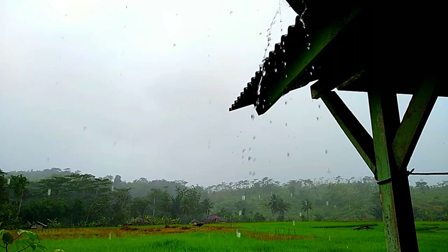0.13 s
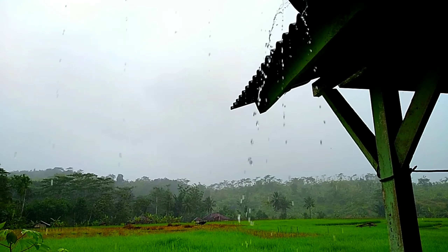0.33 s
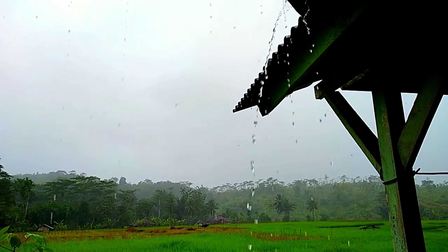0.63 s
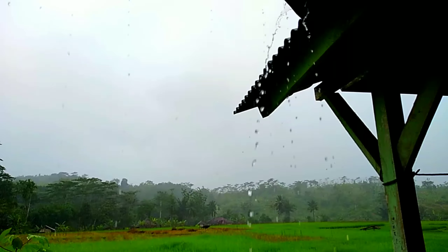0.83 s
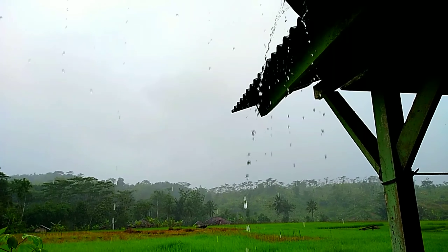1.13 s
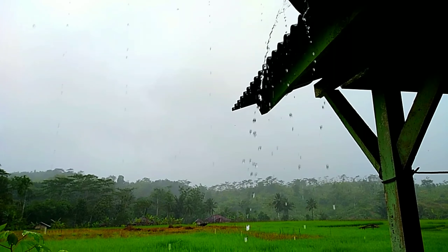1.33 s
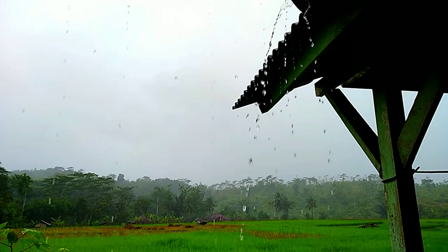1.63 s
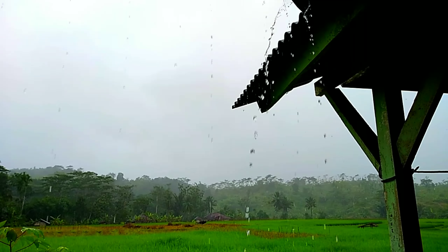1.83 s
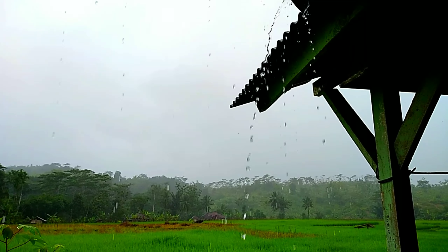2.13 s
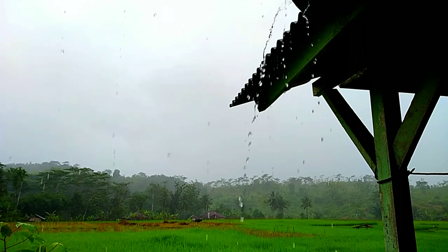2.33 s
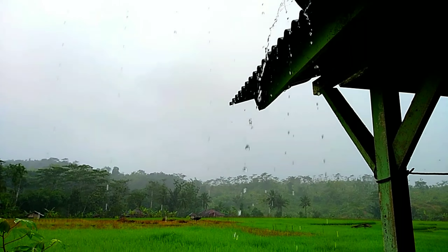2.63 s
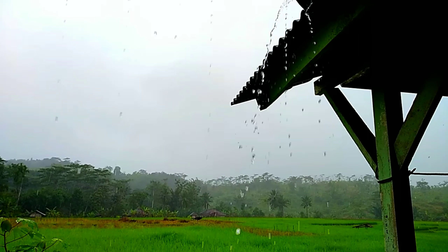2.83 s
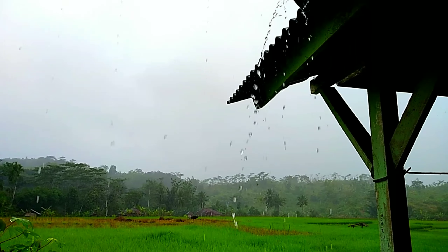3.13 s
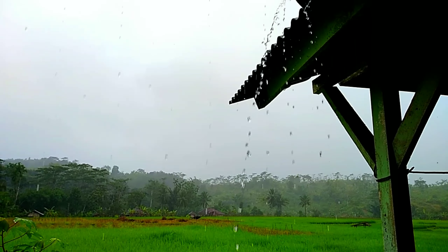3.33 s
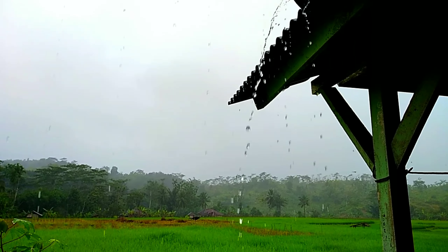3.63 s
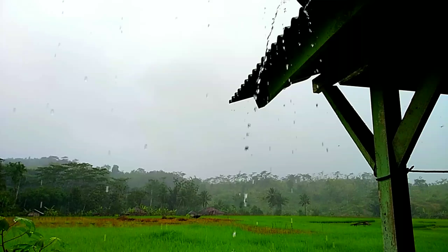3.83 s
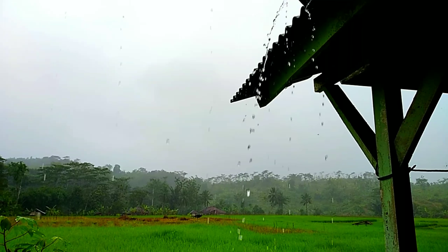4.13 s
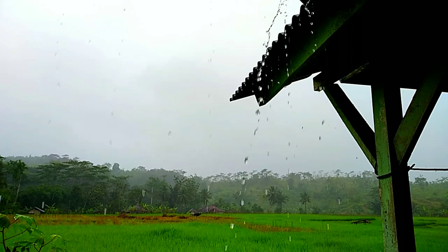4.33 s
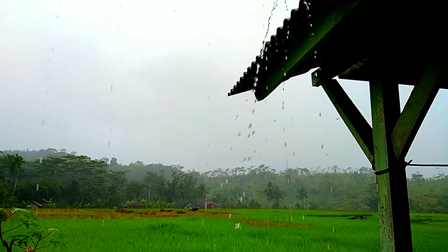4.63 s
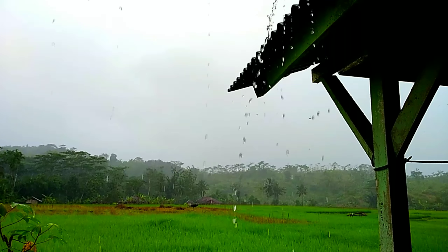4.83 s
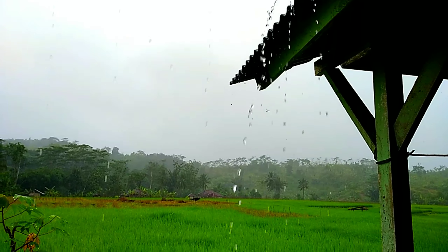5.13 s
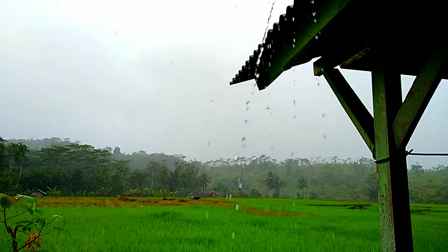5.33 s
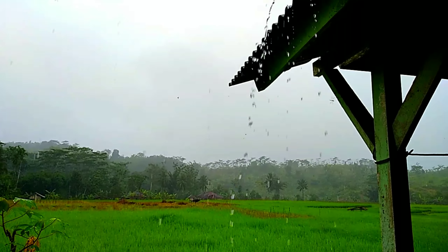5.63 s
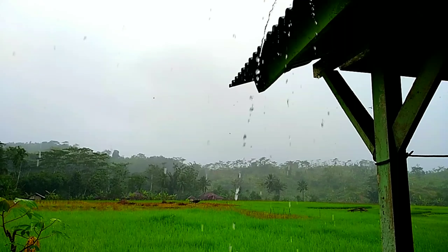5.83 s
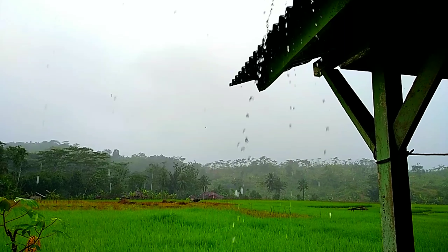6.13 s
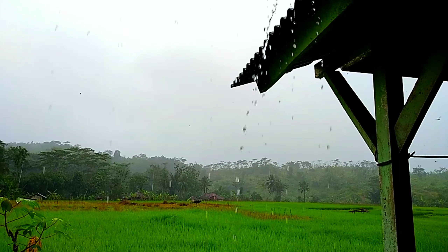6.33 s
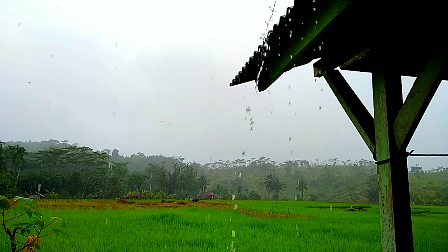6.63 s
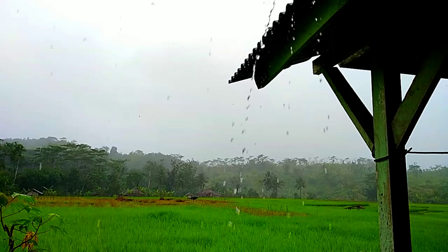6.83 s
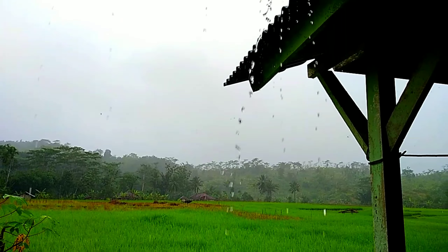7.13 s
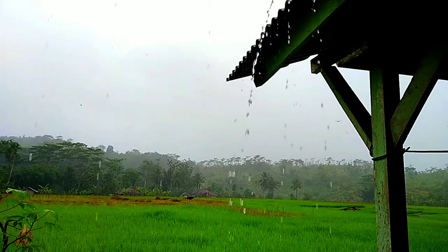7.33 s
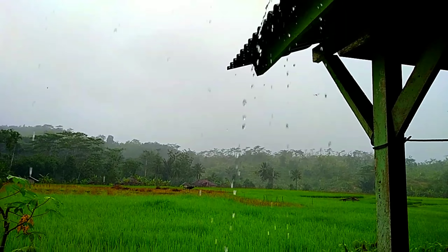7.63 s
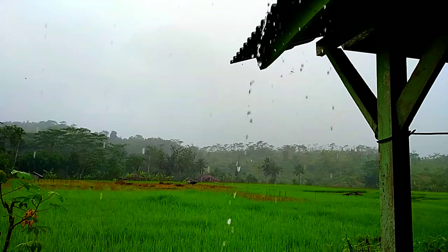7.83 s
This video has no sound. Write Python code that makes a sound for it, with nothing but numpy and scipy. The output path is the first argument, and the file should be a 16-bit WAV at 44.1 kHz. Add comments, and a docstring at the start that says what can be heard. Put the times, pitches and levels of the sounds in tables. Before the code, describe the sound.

Steady rain over green fields is heard from under a corrugated sheet roof, in close, dry outdoor stereo. A broad, bright hiss with gentle patchiness and dense tiny patter runs unchanged for all 8 seconds. Irregular heavy drops and run-off fall on top, several each second: sharp splashy ticks, short noisy splats, and low knocks that ring briefly in the sheet. Quick drips cluster from 0.3 to 0.8 s; strong splashes land at 2.1 and 2.4 s. Hollow little notes follow some drops, around 2.8 and 3.5 s, with a clear resonant plink at 4.5 s and a firm tap at 4.8 s. A bright splat comes at 4.9 s, a dripping flurry at 5.8 s, hollow plops at 6.3 and 7.6 s, and a short hard tap at the very end. Low breeze puffs nudge the left side, most near 2.1, 5.2, 7.1 and 7.5 s.

```python
"""Steady rain over open fields, heard from under a corrugated sheet roof: patchy noise for the far hiss.
Heavy drops and run-off strike the sheet and the wet ground as banded noise bursts through sheet resonances.
Close and faint ticks are short tones with a splash; some drops leave gliding hollow notes.
A light breeze now and then puffs low noise on the left microphone port."""
import sys
import numpy as np
from scipy import signal
from scipy.fft import rfft, irfft, next_fast_len
from scipy.io import wavfile
from scipy.ndimage import uniform_filter1d

SR = 44100
rng = np.random.default_rng(int(sys.argv[2]) if len(sys.argv) > 2 else 0)


def to_wav(s):
    """Save 16-bit WAV."""
    ch = np.atleast_2d(s).T  # columns
    pcm = np.round(np.clip(ch, -1, 1) * 32767)  # PCM
    wavfile.write(sys.argv[1], SR, pcm.astype(np.int16))


N = 351477  # samples


def hiss(patchy_db):
    """Far rain merges into noise with soft patches; its low body stays steadier."""
    hz, _, spectrum = signal.stft(rng.standard_normal((2, N)), SR, nperseg=512)
    patches = uniform_filter1d(rng.standard_normal(spectrum.shape[1:]), size=10, axis=0)
    patches = unit(uniform_filter1d(patches, size=8, axis=1))
    depth_db = patchy_db * along([300, 2500], [.35, 1], hz)[:, None]
    _, noise = signal.istft(spectrum * amp(depth_db * patches), nperseg=512)
    return unit(noise[:, :N])


# Bursts of heavy drops on sheet and ground; rows at the same moment sound together as one drop.
# Each row: start in seconds, level in dB over the hiss (nominal, before the sheet), centre in Hz,
# bandwidth in octaves (nominal), t60 in seconds.
HEAVY_BURSTS = [(.068, 16, 13450, 0.4, .043), (.122, 14, 3200, 0.25, 0.077), (.158, -0.5, 9510, 0.93, 0.51),
                (.251, 6, 15000, 0.97, 0.27), (.303, 11, 8550, 0.22, 0.34), (.327, 13.5, 2920, 0.38, 0.2),
                (.358, 15, 2650, 0.33, 0.15), (.371, 14.5, 1420, 0.18, 0.17),
                (.461, 21.5, 14200, 0.18, 0.32), (.461, 12, 9000, 0.39, 0.22),
                (.519, 12.5, 1670, 0.18, 0.29), (.557, 19.5, 500, 0.41, 0.14),
                (.581, 8.5, 7000, 0.35, 0.54), (.629, 9, 6160, 0.65, 0.35), (.68, 17.5, 2000, 0.16, 0.28),
                (.71, 10.5, 2520, 0.31, 0.25), (.704, 15, 307, 0.24, 0.32), (.756, 8, 1200, 0.44, 0.52),
                (.764, 9, 13450, 0.96, 0.68), (.796, 16, 3060, 0.54, 0.19), (.966, 10.5, 6900, 0.12, 0.45),
                (1.038, 18.5, 1080, 0.23, 0.11), (1.09, 7.5, 6300, 0.7, 0.4),
                (1.143, 8.5, 6730, 0.33, 0.93), (1.243, 10.5, 4430, 0.93, 0.47),
                (1.307, 8.5, 3180, 0.29, 0.45), (1.359, 19, 2000, 0.23, 0.11),
                (1.397, 13, 6450, 0.44, 0.33), (1.403, 16.5, 4000, 0.45, 0.24),
                (1.537, 6, 8000, 0.57, 0.65), (1.602, 16, 7200, 0.32, 0.2), (1.694, 13.5, 1310, 0.38, 0.31),
                (1.737, 11.5, 7900, 0.38, 0.85), (1.814, 19, 2690, 0.099, 0.19),
                (1.838, 8, 15000, 0.38, 0.49), (1.95, 12.5, 5500, 0.12, 0.35),
                (1.987, 8.5, 360, 0.73, 0.83), (2.007, 5.5, 9000, 0.69, .15),
                (2.007, 22.5, 2660, 0.18, 0.14), (2.047, 13.5, 2740, 0.28, 0.54),
                (2.01, 12.5, 846, 0.29, 0.46), (2.048, 15.5, 890, 0.28, 0.36), (2.053, 22, 290, 0.15, 0.2),
                (2.081, 21.5, 7900, 0.26, 0.17), (2.081, 28, 2260, 0.29, 0.072),
                (2.173, 10.5, 5200, 0.68, 1), (2.285, 12, 6600, 0.61, 0.15), (2.4378, 25, 5260, 0.69, 0.2),
                (2.449, 20, 8600, 0.14, 0.26), (2.466, 20.5, 6730, 0.31, 0.25),
                (2.44, 11, 3000, 0.37, 0.27), (2.48, 4.5, 1970, 1, 0.97), (2.52, 12, 426, 0.41, 0.22),
                (2.702, 9, 1910, 0.32, 0.29), (2.732, 16.5, 756, 0.67, 0.18), (2.796, 16, 483, 0.93, 0.4),
                (2.8, 13, 6860, 0.37, 0.24), (2.844, 18, 4400, 0.31, 0.23),
                (2.856, 19.5, 1150, 0.36, 0.085), (2.94, 15, 2800, 0.32, 0.23),
                (2.971, 14.5, 630, 0.63, 0.2), (3.001, 17, 285, 0.27, 0.16), (3.051, 9, 5140, 1, 0.43),
                (3.097, 8.5, 1410, 1, 0.13), (3.15, 12, 150, 0.27, 0.99), (3.197, 12.5, 7800, 0.8, 0.18),
                (3.375, 11, 3380, 0.24, 0.97), (3.4, 12.5, 1780, 0.25, 0.56), (3.408, 10, 5570, 0.28, .5),
                (3.45, 5, 6600, 0.24, 0.27), (3.466, 9, 5600, 0.22, 0.32), (3.5, 20.5, 268, 0.28, 0.4),
                (3.514, 19.5, 915, 0.38, 0.35), (3.588, 6, 6730, 0.45, 0.38),
                (3.638, 8.5, 1180, 0.67, 0.96), (3.656, 19.5, 2340, 0.26, 0.16),
                (3.682, 23, 14500, 0.27, 0.14), (3.688, 10, 14000, 0.34, 0.12),
                (3.724, 10, 2030, 0.18, 0.97), (3.817, 4.5, 7950, 0.9, 0.51), (4.013, 1, 5000, 0.48, 0.35),
                (4.013, 19.5, 587, 0.35, 0.059), (4.097, 10, 6100, 0.38, 0.38),
                (4.238, 11.5, 6550, 0.35, 0.24), (4.264, 18.5, 590, 0.31, 0.24), (4.38, 13, 920, .4, 0.18),
                (4.44, 18.5, 1240, 0.59, 0.13), (4.476, 22.5, 2220, 0.38, 0.11),
                (4.505, 11, 2940, 0.75, 0.21), (4.578, 10, 6370, 0.28, 0.42), (4.697, 2.5, 2500, 1, 0.96),
                (4.723, 16.5, 6250, 0.29, 0.79), (4.795, 18.5, 5900, 0.15, 0.13),
                (4.835, 28.5, 1500, 0.13, 0.12), (4.915, 7.5, 744, 1, 0.86),
                (4.916, 17.5, 7250, 0.98, 0.28), (4.965, 14, 2370, 0.31, 0.11),
                (4.985, 13, 5900, 0.38, 0.23), (5.076, 9, 3530, 0.55, 0.59), (5.094, 6.5, 820, 0.92, 0.36),
                (5.171, 5, 8000, 0.99, 0.13), (5.19, 8, 2760, 0.17, 0.59), (5.354, 10.5, 5570, .26, 0.4),
                (5.388, 21, 1880, 0.28, 0.039), (5.396, 12, 6640, 0.18, .35), (5.49, 4, 15000, 1, 1),
                (5.553, 9.5, 350, .25, .93), (5.605, 11, 990, 0.31, 0.44), (5.635, 16, 430, 1, 0.23),
                (5.747, 13.5, 6170, 0.2, 0.6), (5.747, 12, 2860, 0.17, 0.42),
                (5.777, 24.5, 2740, 0.14, 0.21), (5.777, 15.5, 2660, 1, 0.16),
                (5.903, 8.5, 2070, 0.58, 0.48), (5.942, 10, 6570, 0.19, 0.56), (6.034, 12, 6440, 0.2, 0.14),
                (6.146, 2, 9000, 0.72, .3), (6.202, 4, 11100, .95, 1), (6.228, 13.5, 1050, 0.5, 0.24),
                (6.234, 11.5, 5230, 0.21, 0.52), (6.252, 14, 1040, 0.92, 0.78),
                (6.29, 25, 1400, 0.32, 0.12), (6.328, 13.5, 6800, 0.14, 0.3), (6.364, 20.5, 855, 1, 0.068),
                (6.499, 25, 9300, 0.43, 0.018), (6.557, 12, 5900, 0.23, 0.24),
                (6.591, 11, 2480, 0.25, 0.22), (6.591, 7, 4500, 0.91, 0.62), (6.623, 17, 6660, 0.16, 0.18),
                (6.629, 11, 1950, 0.93, 0.14), (6.662, 19, 650, 0.5, 0.16), (6.695, 11, 5660, 0.41, 0.42),
                (6.733, 14, 7650, 0.31, 0.55), (6.737, 11, 1440, 0.67, 0.5), (6.759, 23, 1260, 0.16, 0.08),
                (6.813, 10, 505, 0.88, 0.38), (6.842, 15, 1010, 0.21, 0.35), (6.958, 8, 350, 1, 0.42),
                (7.004, 9, 1980, 0.67, 0.18), (7.027, 10, 1870, 0.53, 0.27), (7.026, 5, 13450, 1, 0.59),
                (7.118, 9, 4970, 0.26, 0.57), (7.339, 6.5, 5030, 0.63, 0.77),
                (7.427, 6.5, 1940, 0.31, 0.52), (7.447, 11, 6860, 0.2, 0.3), (7.477, 14, 3420, .2, 0.15),
                (7.497, 23.5, 3150, 0.18, 0.15), (7.497, 12, 11200, 0.47, 0.15),
                (7.509, 7.5, 1420, 0.79, 1), (7.558, 16, 860, 0.47, 0.59), (7.745, 14, 570, 0.32, 0.14),
                (7.774, 11, 6800, 0.18, 0.24), (7.794, 19, 1110, 0.43, 0.094), (7.814, 6, 2050, 0.25, 0.98),
                (7.583, 10, 2110, .2, .25), (7.618, 11, 2060, .2, .2), (7.92, 14, 1770, 0.37, 0.25),
                (7.962, 30, 2010, 0.085, 0.055)]
BURST_SIDE_DB, BURST_SCATTER_DB = -0.5, 2.5  # left-right: mean, full range of scatter


def heavy_drops():
    """The bursts of the heavy drops, each given a random side."""
    side_db = BURST_SIDE_DB + BURST_SCATTER_DB * (rng.random(len(HEAVY_BURSTS)) - .5)
    return np.column_stack([HEAVY_BURSTS, side_db])


def small_drops(count, floor_db):
    """Lighter bursts at random moments, levels, pitches and sides, in the columns of heavy_drops()."""
    u = rng.random((count, 6))
    start_s = u[:, 0] * N / SR
    level_db = floor_db + 6 * u[:, 1] ** 2
    centre_hz = 300 * 2 ** (5.94 * u[:, 2] ** 0.92)
    octaves = 0.19 + 0.71 * u[:, 3]
    t60_s = 0.08 + 0.19 * u[:, 4]
    side_db = 8 * (u[:, 5] - .5)
    return np.array([start_s, level_db, centre_hz, octaves, t60_s, side_db]).T


def strikes(rows, crack, spatter_db):
    """Each row is one banded burst: a crack, then a decay broken up by spatter; the sheet rings on."""
    start_s, level_db, centre_hz, octaves, t60_s, side_db = np.transpose(rows)[..., None]
    t = np.arange(SR // 4) / SR

    def band(hz):
        offset = np.log2((hz + 1) / centre_hz) / np.maximum(octaves, .08)
        return np.exp(-.22 * np.abs(offset) ** 3.04)

    burst = filtered(rng.standard_normal((2, len(rows), len(t))), band)
    rise = 1 - np.exp(-t / (0.00096 + 2.0 / centre_hz))  # low drumming takes a few cycles to build
    decay = amp(-60 * t / np.maximum(t60_s, .02)) * np.cos(2 * np.pi * t)  # cosine reaches 0 at 0.25 s
    shape = rise * (decay + crack * amp(-60 * t / 0.0048))
    bumps = np.clip(wobble(750, burst.shape[1:]), -.6, 1.7)
    spatter = amp(spatter_db * bumps * (np.minimum(centre_hz, 5500) / 4000) ** 0.12)
    burst = burst * shape * spatter
    # a burst's energy is set by its row, however the spatter falls
    band_power = np.mean(band(np.linspace(0, SR / 2, num=2000)) ** 2, axis=1)
    due = band_power * np.sum(shape ** 2, axis=1)
    energy = np.mean(np.sum(burst ** 2, axis=2), axis=0)
    burst = burst * np.sqrt(due / energy)[:, None]
    burst = burst * amp(level_db) * amp([side_db / 2, -side_db / 2])
    return filtered(placed(start_s[:, 0], burst), sheet)


# Resonances of the roof sheet. Each row: centre in Hz, width in Hz, peak gain in dB (of that mode alone).
SHEET_MODES = [(251.6, 4, 6), (423, 72, 4), (766, 10, 3), (907, 22, 6), (1112, 13, 9.5), (1563, 49, 7.5),
               (1785, 23, 11), (2043, 38, 8.5), (2420, 74, 5.5), (2730, 37, 8), (3093, 7.9, 12.5),
               (5320, 120, 7), (6640, 600, 4)]


def sheet(hz):
    """Roof sheet response: the direct sound plus a band-pass resonance for each mode."""
    response = 1
    for centre_hz, width_hz, gain_db in SHEET_MODES:
        damping = 1j * hz * width_hz
        response = response + (amp(gain_db) - 1) * damping / (centre_hz ** 2 - hz ** 2 + damping)
    return response


# Sharp close ticks; rows nearly together give one tick several pitches. Each row: start in seconds,
# peak in dB (nominal), pitch in Hz, left-right level in dB.
CLOSE_TICKS = [(.1212, -37, 9930, 3), (.1575, -24, 6720, 1), (.1577, -22, 12800, 5), (.1577, -33, 3300, 10),
               (.232, -32, 6040, 0), (.3042, -29, 6700, 2), (.3125, -29, 8200, 2), (.3032, -28, 8640, 3),
               (.328, -34, 2480, 8), (.3336, -28, 3280, 17), (.36, -40, 2420, 10), (.367, -31, 2690, 10),
               (.372, -33, 2700, 10), (.3745, -31, 3000, 10), (.4003, -29, 2310, 1), (.4003, -28, 7420, 8),
               (.4408, -30, 6500, 0), (.4615, -22, 8650, 4), (.5412, -28, 9350, 2.5), (.541, -32, 14000, 7),
               (.54, -32, 1600, 0), (.571, -34, 3300, 8), (.651, -26, 7500, 0), (.68, -27, 14000, 7),
               (.707, -28, 14500, 7), (.7135, -26, 12500, 7), (.6838, -33, 2020, 4),
               (.6015, -29.5, 3280, 7), (.603, -26, 6500, 0), (.6295, -16, 6760, -5),
               (.6295, -21, 10300, 4), (.7653, -29, 9420, 2), (.8028, -28, 2900, 7), (.814, -26, 3330, 9),
               (.9662, -32, 6560, -16), (1.1443, -27, 6060, 12), (1.1653, -27, 7300, 14),
               (1.2116, -27, 7140, .5), (1.256, -34, 5900, 2), (1.264, -31, 3080, 10),
               (1.3084, -31, 2900, 15), (1.3593, -28, 2000, -3), (1.3967, -29, 5570, 2),
               (1.4036, -26, 3560, 19), (1.413, -25, 3640, 19), (1.428, -26, 3270, 12),
               (1.5376, -24, 9130, -6), (1.5614, -27, 6600, -2.5), (1.603, -15.5, 6600, -3),
               (1.737, -22, 6500, 6), (1.696, -32, 1300, 0), (1.754, -27, 9300, 1), (1.774, -20.5, 8400, 9),
               (1.789, -28, 5700, -2), (1.789, -28, 8600, 0), (1.804, -29, 8600, 0), (1.8188, -31, 2630, 9),
               (1.925, -30, 9500, 2), (1.95, -29, 5600, -4), (1.9607, -24, 5600, -6),
               (2.0074, -22, 2500, 2), (2.0078, -25, 7500, 1), (2.018, -23, 2800, 7), (2.022, -22, 2800, 9),
               (2.0487, -24, 2800, 16), (2.0555, -24, 2900, 14), (2.0645, -27, 3130, 15),
               (2.082, -13, 6840, -1), (2.0822, -16, 12900, 13), (2.082, -16, 2360, 10),
               (2.171, -20, 8850, 2), (2.1834, -33, 3750, 9), (2.2847, -26, 7000, 4),
               (2.4376, -10, 5450, -6), (2.438, -13, 6860, -7), (2.4384, -18, 10600, -3),
               (2.438, -21, 3400, 15), (2.7993, -32, 5430, -7), (2.7993, -38, 7500, 1),
               (2.8055, -29, 6360, 0), (2.8135, -33, 6400, 0), (2.833, -29, 8500, 0),
               (2.8433, -26, 4170, 3), (2.8433, -35, 2900, 6), (2.9365, -32, 6600, 0),
               (2.9365, -29, 2290, 6), (2.9495, -24.5, 3080, 12), (2.9537, -26.5, 3000, 17),
               (2.962, -27, 3060, 14), (3.0833, -23, 6800, -3), (3.1971, -21, 7060, 0),
               (3.4015, -34, 3200, 9), (3.409, -35, 3200, 9), (3.4175, -30, 3500, 9),
               (3.4256, -24, 5300, 0), (3.426, -33, 1880, 3), (3.4305, -27, 5700, 0),
               (3.447, -32, 3230, 12), (3.4663, -25, 5200, -1), (3.517, -27, 950, 8),
               (3.5235, -29, 6900, 1), (3.5885, -32, 7500, 0), (3.6565, -21.5, 2140, 3),
               (3.6645, -29, 2300, 5), (3.672, -32, 2280, 5), (3.706, -22, 14600, 7),
               (3.6812, -19, 14600, 11), (3.6812, -22, 9900, -1), (3.899, -25.5, 6440, 3),
               (4.0971, -26, 6840, -3), (4.107, -24, 7400, -6), (4.211, -27, 10400, 1.5),
               (4.2383, -29, 6400, 1), (4.4408, -26, 1570, -10), (4.469, -33, 2130, 7),
               (4.4753, -12, 1890, 4), (4.5252, -27, 2200, 7), (4.5295, -32, 2100, 4),
               (4.5171, -25.5, 10800, 1.5), (4.5765, -32, 5330, -1), (4.6925, -25.5, 9400, -3),
               (4.7278, -23, 6750, -12), (4.7508, -16, 6700, -6), (4.768, -19, 7050, -5),
               (4.797, -22, 6840, -8), (4.9165, -11.5, 8900, 0), (4.9162, -22, 3010, 9),
               (4.9641, -28, 2260, 4), (5.171, -39, 7000, 0), (5.3967, -24.5, 5970, -14),
               (5.491, -25, 9140, -5), (5.5975, -26, 7000, -6), (5.747, -24, 5900, -12),
               (5.7647, -24, 6070, -5), (5.7645, -28, 2760, 5), (5.7773, -15, 2450, 0),
               (5.7798, -17, 2400, 1), (5.7775, -26, 6300, -2), (5.7852, -24, 2500, 4),
               (5.7905, -23, 2800, 5), (5.8005, -22, 2620, 5), (5.8122, -24, 2920, 8),
               (5.8095, -24, 6760, -3), (5.9434, -29, 2310, 1), (5.944, -31, 6400, -1.5),
               (6.035, -33, 6560, 10), (6.055, -29, 6500, -2), (6.1462, -32, 10800, 0),
               (6.176, -31, 7000, -3), (6.2026, -24, 9300, -1), (6.2682, -28, 5400, -7),
               (6.272, -26, 5300, -3), (6.31, -27, 11500, 2), (6.328, -33, 7100, 0), (6.364, -37, 1100, 0),
               (6.4368, -26, 2100, -2), (6.4992, -30, 10100, 6), (6.629, -33, 1350, 0),
               (6.629, -31, 2300, 5), (6.655, -33, 2200, 5), (6.6872, -32, 6490, -5),
               (6.5565, -27, 5840, -10), (6.7063, -26.5, 5900, -13), (6.7385, -19, 8940, -3),
               (6.739, -25, 1160, -1), (6.7385, -29, 1730, 2), (6.748, -24, 1090, 0),
               (6.7585, -29, 1290, 0), (6.802, -33, 1400, 0), (7.004, -27.5, 1940, 6),
               (7.017, -31, 2200, 4), (7.0259, -33, 10700, -1), (7.027, -37, 2900, 5),
               (7.032, -29, 2100, 4), (7.053, -32, 1550, -2), (7.057, -36, 3000, 8), (7.199, -22, 7200, -2),
               (7.3397, -27, 7460, 8), (7.3567, -25, 6610, 10), (7.4505, -28, 2330, 1),
               (7.4778, -24, 3160, 8), (7.4977, -18, 3140, 13), (7.597, -33, 950, 2), (7.797, -37, 990, 2),
               (7.7742, -24, 7370, -2), (7.9209, -28, 2170, 6)]


def close_ticks():
    """Sharp close ticks, each row a short pitched splash."""
    return ticks(CLOSE_TICKS, cycles=3.07, snap=0.19, size=1024)


def patter(count, floor_db):
    """Faint droplets at random moments, levels, pitches and sides, in the columns of CLOSE_TICKS."""
    u = rng.random((count, 4))
    start_s = u[:, 0] * N / SR
    peak_db = floor_db + 9 * u[:, 1] ** 4
    pitch_hz = 1300 * 2 ** (3.8 * u[:, 2])
    side_db = 14 * (u[:, 3] - .5)
    return np.array([start_s, peak_db, pitch_hz, side_db]).T


SNAP_S = 0.001  # decay constant of the first contact


def ticks(rows, cycles, snap, size):
    """Each row is a wide snap and a few cycles at one pitch, slightly out of phase between ports."""
    start_s, peak_db, hz, side_db = np.transpose(rows)[..., None]
    t = np.arange(size) / SR
    age = t * hz / (cycles * (hz / 4000) ** 0.5)  # in tick lives; cycles holds at 4 kHz
    lead_rad = rng.normal(0, .45, (len(start_s), 2)).T[..., None]
    splash = np.diff(rng.standard_normal((len(start_s), 2, len(t) + 1))).transpose(1, 0, 2)
    tone = np.sin(2 * np.pi * hz * t + lead_rad) + hz / 32000 * splash  # high ticks splash more
    body = tone * (age * np.exp(1 - age)) ** 1.45
    contact = snap * splash * np.exp(-t / SNAP_S)
    gain = amp(peak_db) * amp([side_db / 2, -side_db / 2])
    return placed(start_s[:, 0], gain * (body + contact))


# Hollow notes that drops leave in the sheet or a puddle; rows at the same moment sound together.
# Each row: start in seconds, relative level in dB, starting pitch in Hz, t60 in seconds,
# initial pitch rise in octaves per second.
HOLLOW_NOTES = [(.706, -31.5, 260, 0.064, 8), (.727, -39, 385, .08, 6), (.756, -39.5, 385, 0.16, -3),
                (.775, -36, 370, 0.074, 0), (.826, -42, 403, 0.079, 7), (1.982, -42, 340, 0.078, 15),
                (2.075, -39, 313, .09, 7), (2.086, -34.5, 735, 0.059, 0.5), (2.796, -28.5, 405, 0.07, 3),
                (2.814, -33.5, 476, 0.096, 16.5), (2.834, -42, 396, 0.14, -6.5),
                (2.848, -37, 710, 0.1, 2.5), (2.864, -42, 880, 0.095, 9), (3.514, -35.5, 936, 0.11, -2),
                (3.55, -52, 846, 0.22, 6), (3.562, -37, 225, 0.056, 16), (4.272, -39, 490, 0.051, 5),
                (4.368, -42, 380, 0.17, -1), (4.374, -35, 897, 0.046, 2), (4.39, -39, 960, 0.066, 2),
                (4.4764, -19, 1793, .05, 0), (4.4764, -19.5, 2010, .055, 0), (4.4764, -24, 2230, .05, 0),
                (4.507, -30, 2050, 0.07, 1), (4.822, -16, 1450, 0.023, 2), (4.95, -28.5, 402, 0.06, -1),
                (5.603, -48, 907, .07, 0), (5.647, -35, 400, 0.11, -1.5), (6.23, -40, 393, 0.4, 0.5),
                (6.266, -27, 923, 0.072, 1), (6.273, -31.5, 394, .08, 3.5), (6.286, -26, 1960, 0.04, -1),
                (6.36, -38, 1100, 0.065, 1), (6.371, -35, 534, 0.085, 13), (6.809, -37.5, 376, 0.25, 4.5),
                (6.837, -40, 412, 0.12, 6.5), (7.425, -29, 2025, 0.041, -3), (7.583, -24, 385, 0.076, 1),
                (7.583, -33, 2020, 0.05, 0), (7.628, -29, 934, 0.029, 11), (7.649, -43, 385, 0.13, -0.5),
                (7.716, -36, 384, 0.094, 19.5), (7.743, -40, 600, 0.11, 6)]
NOTE_RISE_CYCLES, NOTE_WAVER_DB, NOTE_SIDE_DB = 2.43, 0.5, 3  # build-up, unsteadiness, left-right level
NOTE_BLUR_RAD_PER_S = 45  # growth of random phase, separate at each port


def notes():
    """Each note builds over a few cycles and dies away, gliding, wavering and growing rougher."""
    start_s, level_db, hz, t60_s, rise = np.transpose(HOLLOW_NOTES)[..., None]
    t = np.arange(SR // 8) / SR
    waver = amp(NOTE_WAVER_DB * wobble(70, (len(start_s), len(t))))
    blur_rad = NOTE_BLUR_RAD_PER_S * t * wobble(88.7, (2, len(start_s), len(t)))
    build = (1 - np.exp(-t * hz / NOTE_RISE_CYCLES)) ** 2
    decay = amp(level_db - 60 * t / t60_s) * np.cos(4 * np.pi * t)  # cosine reaches 0 at 0.125 s
    glide_rad = 2 * np.pi * hz * t * (1 + np.log(2) * rise * t / 2)
    tone = 2 * build * decay * waver * np.sin(glide_rad + blur_rad)
    return placed(start_s[:, 0], tone * amp([[[NOTE_SIDE_DB / 2]], [[-NOTE_SIDE_DB / 2]]]))


# Puffs of breeze. Each row: middle in seconds, level in dB (before top rounding and port gains),
# half length in seconds.
BREEZE_PUFFS = [(.18, -67, 0.055), (0.343, -54, .06), (0.397, -53, 0.055), (0.55, -49, 0.064),
                (.9, -71, .15), (1.462, -51, 0.07), (1.573, -55, 0.058), (1.69, -64, .06),
                (2.118, -38, 0.049), (2.271, -41.5, 0.037), (2.417, -58, .05), (2.908, -56, 0.086),
                (4.238, -66, .06), (4.59, -58, 0.045), (5.103, -61, .07), (5.246, -42, 0.037),
                (5.447, -54, 0.13), (6.48, -73, 0.18), (7.143, -35, 0.035), (7.471, -35.5, 0.048),
                (7.566, -54, 0.091), (7.724, -45, 0.043), (7.25, -62, .08), (7.79, -55, 0.05)]
PUFF_FADE_DB, PUFF_SHAPE, CALM_DB = 26.5, 0.82, -83.5  # loss near a half length, power law, still air


def puffs():
    """Each puff swells and fades in the same way above the still air."""
    middle_s, level_db, half_s = np.transpose(BREEZE_PUFFS)[..., None]
    away = np.abs(np.arange(N) / SR - middle_s) / half_s
    fade_db = PUFF_FADE_DB * (away ** 2 + 0.032) ** (PUFF_SHAPE / 2)
    return amp(CALM_DB) + np.sum(amp(level_db - fade_db), axis=0)


def breeze():
    """Low turbulence whose strength follows each puff, almost only on the windward left port."""
    lumps = filtered(rng.standard_normal((2, N)), lambda hz: (hz / 55) ** 6 / (1 + (hz / 55) ** 6) ** 1.43)
    power = np.abs(uniform_filter1d(lumps ** 2, size=SR // 20))
    lumps = lumps / np.sqrt(power + 1e-12)
    return lumps * puffs() * amp([[5], [-18]])


# Likeness of the two ports. Each row: frequency in Hz, left-right correlation from 0 to 1.
PORT_LIKENESS = [(60, 1), (180, 0.96), (550, 0.77), (1650, 0.018), (4970, 0.071), (15000, 0.08)]


def spread(pair):
    """Unrelated left and right signals made alike in the bass, left apart in the treble."""
    def turn(hz):
        return np.arccos(np.clip(along(*np.transpose(PORT_LIKENESS), hz), -1, 1)) / 2

    mid = filtered((pair[0] + pair[1]) / np.sqrt(2), lambda hz: np.cos(turn(hz)))
    side = filtered((pair[0] - pair[1]) / np.sqrt(2), lambda hz: np.sin(turn(hz)))
    return np.array([mid + side, mid - side])


# Colour of the rain at the microphone ports. Each row: frequency in Hz, left gain in dB, right gain in dB.
PORT_COLOUR = [(30.2, -41, -32), (62, -16, -14), (118, -15.5, -15), (298, -12, -12.5), (790, -9, -10),
               (1580, -10, -9.5), (2240, -3.5, -7), (3050, -1, -15.5), (3410, -2, -8), (4180, -12, -13.5),
               (4850, -10, -9), (7400, -6.5, -6), (10600, -4, -4.5), (12250, -6.5, -14), (15200, -7.5, -12)]


def at_ports(rain):
    """The shelter around each port colours its rain by a smooth frequency response."""
    f, left_db, right_db = np.transpose(PORT_COLOUR)
    return filtered(rain, lambda hz: amp([along(f, left_db, hz), along(f, right_db, hz)]))


def amp(db):
    """Gain of a level in dB."""
    return 10 ** (np.asarray(db) / 20)


def unit(x):
    """x brought to rms 1."""
    return x / np.sqrt(np.mean(x ** 2) + 1e-20)


def along(f, v, hz):
    """Values v at frequencies f, read on a log axis."""
    return np.interp(np.log(hz + 1), np.log(np.asarray(f) + 1), v)


def wobble(rate_hz, shape):
    """Smooth random curves, rate_hz knots a second."""
    knots = rng.standard_normal(shape[:-1] + (int(shape[-1] * rate_hz / SR) + 2,))
    return signal.resample(knots, int(knots.shape[-1] * SR / rate_hz), axis=-1)[..., :shape[-1]]


def filtered(x, response):
    """x shaped in its spectrum by a response of frequency."""
    m = next_fast_len(x.shape[-1] + 2048)
    return irfft(rfft(x, m) * response(np.fft.rfftfreq(m, 1 / SR)), m)[..., :x.shape[-1]]


def placed(times_s, sounds):
    """Short stereo sounds (2, events, samples) laid out at their times."""
    out = np.zeros((2, N + sounds.shape[-1]))
    for k, start in enumerate(np.clip(times_s * SR, 0, N).astype(int)):
        out[:, start:start + sounds.shape[-1]] += sounds[:, k]
    return out[:, :N]


def scene():
    """Rain and drops coloured at the ports, plus close ticks, hollow notes and the breeze."""
    rain = hiss(patchy_db=3.0)
    rain = rain + strikes(heavy_drops(), crack=0.48, spatter_db=2.5)
    rain = rain + strikes(small_drops(count=190, floor_db=3.0), crack=0.27, spatter_db=1.5)
    rain = rain + ticks(patter(count=4500, floor_db=-11.0), cycles=2.7, snap=0.18, size=256)
    return amp(-29.5) * at_ports(spread(rain)) + close_ticks() + notes() + breeze()


TOP_HZ = 15450


def record(dry):
    """The recorder rounds off the loudest peaks and keeps nothing above its band limit."""
    rounded = dry / (1 + np.abs(dry / .92) ** 6) ** (1 / 6)
    return filtered(rounded, lambda hz: hz < TOP_HZ)


dry = scene()
out = record(dry)
to_wav(out)
```